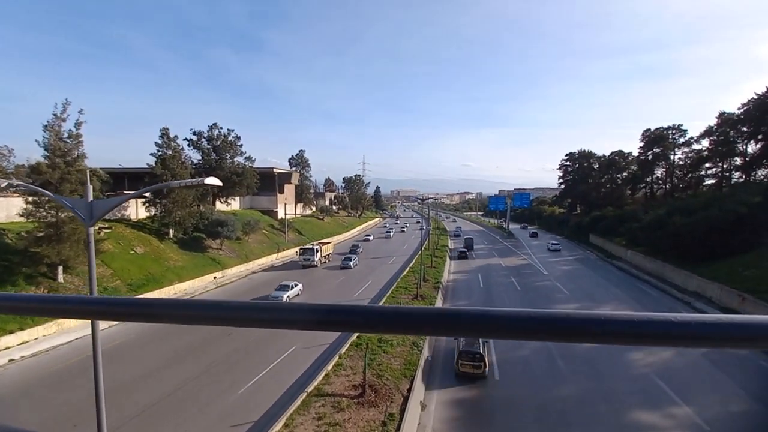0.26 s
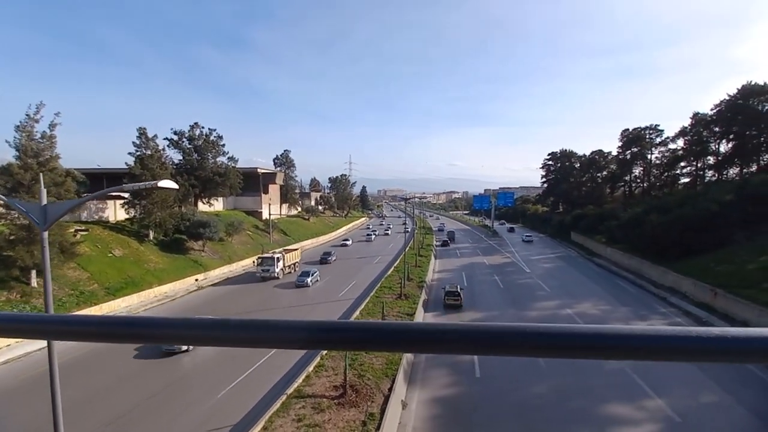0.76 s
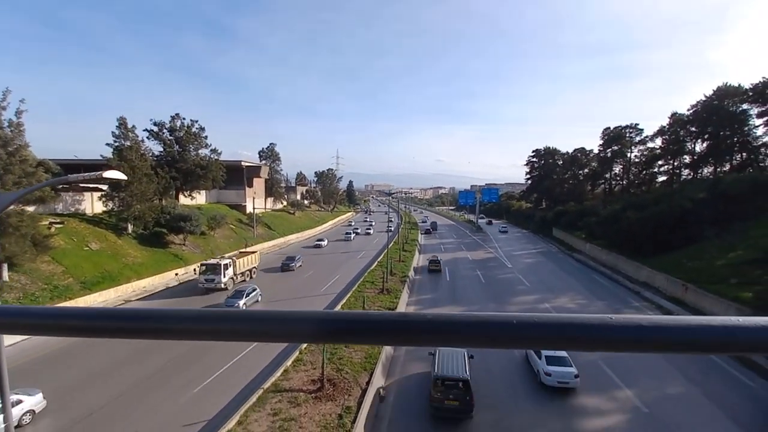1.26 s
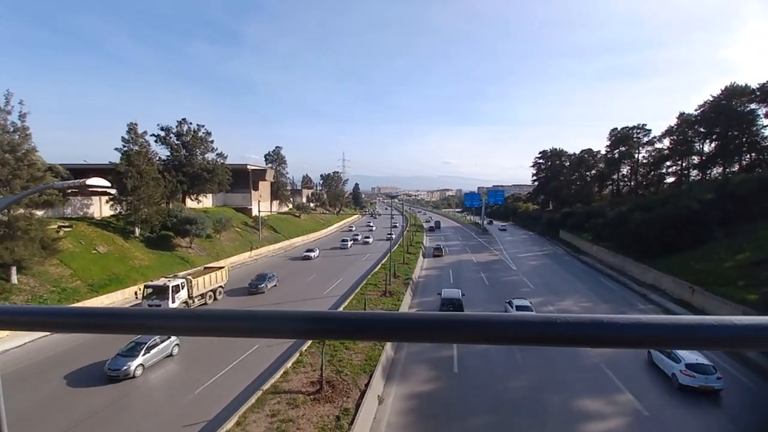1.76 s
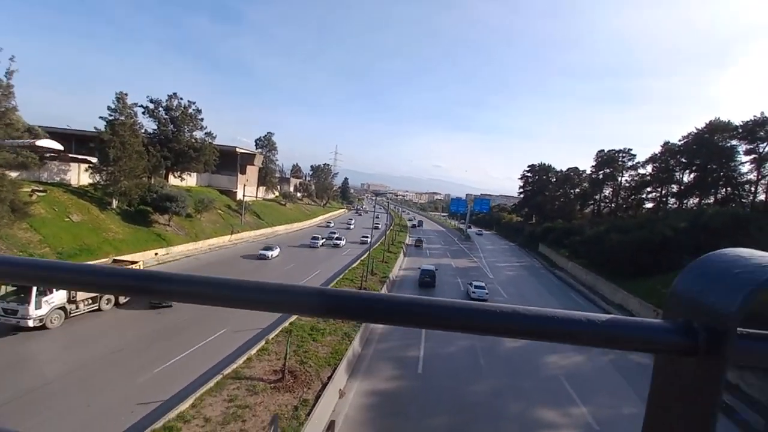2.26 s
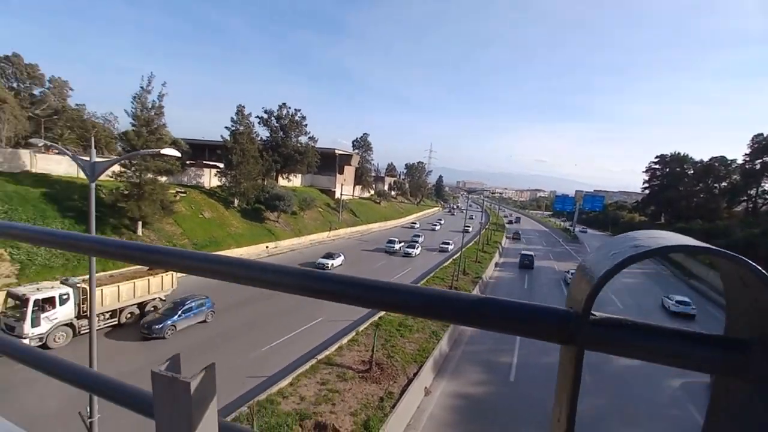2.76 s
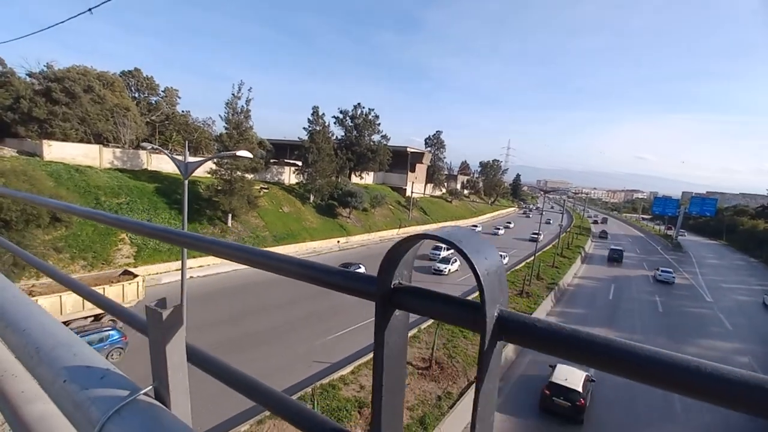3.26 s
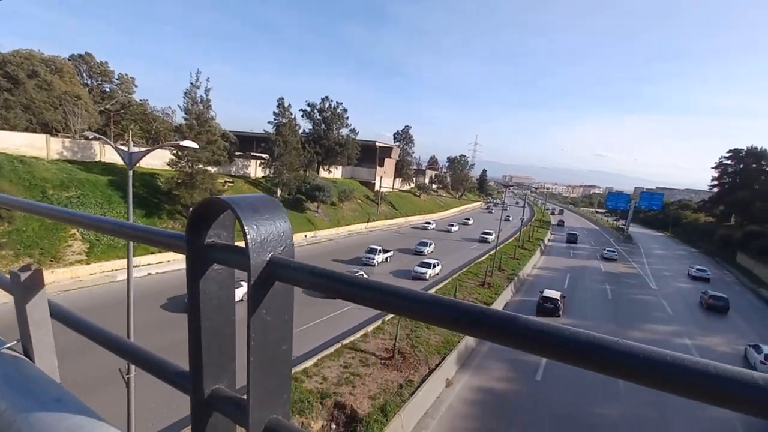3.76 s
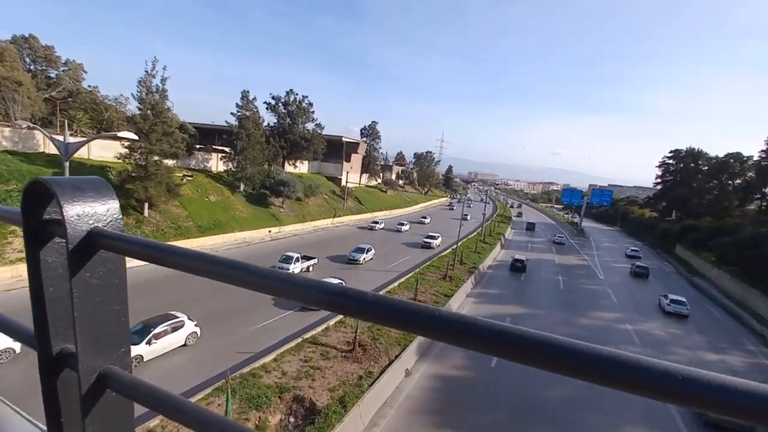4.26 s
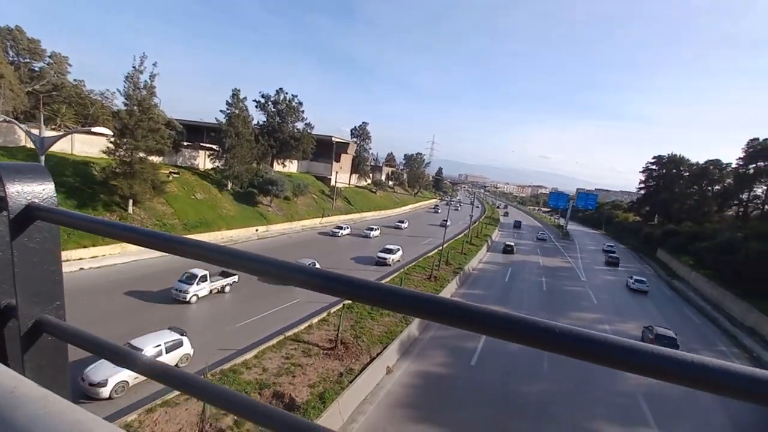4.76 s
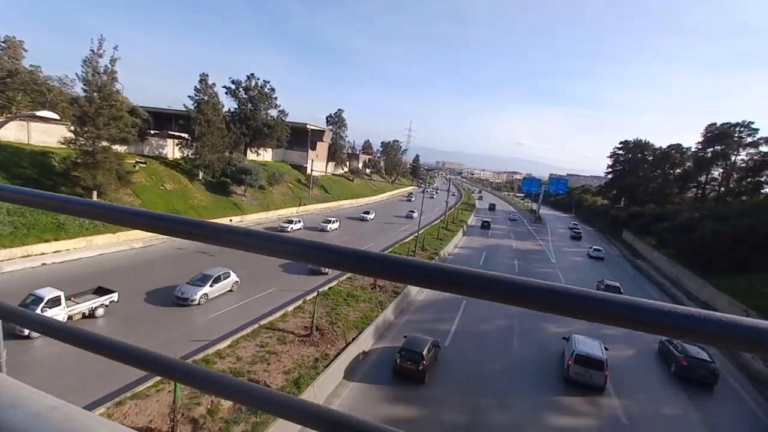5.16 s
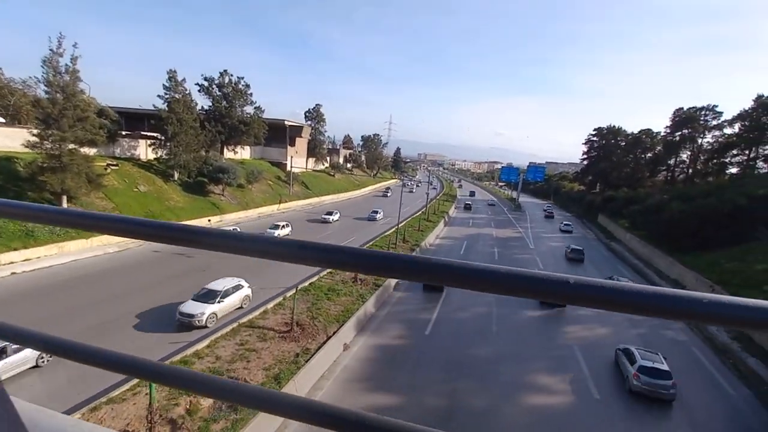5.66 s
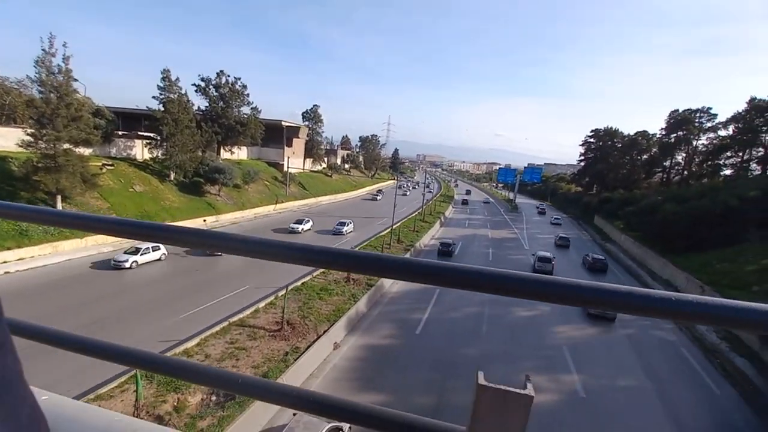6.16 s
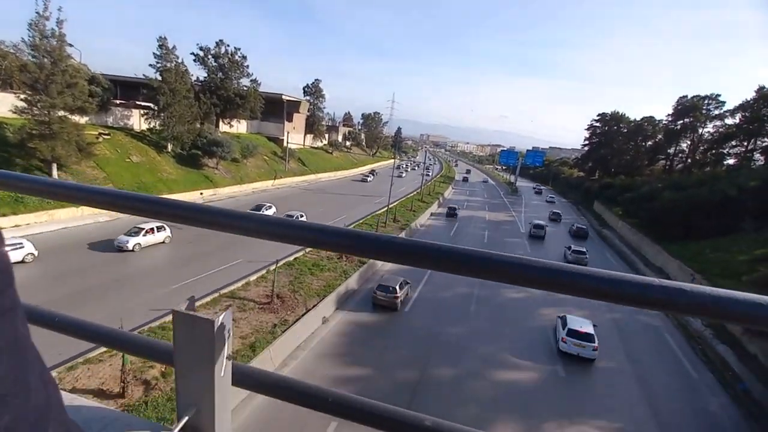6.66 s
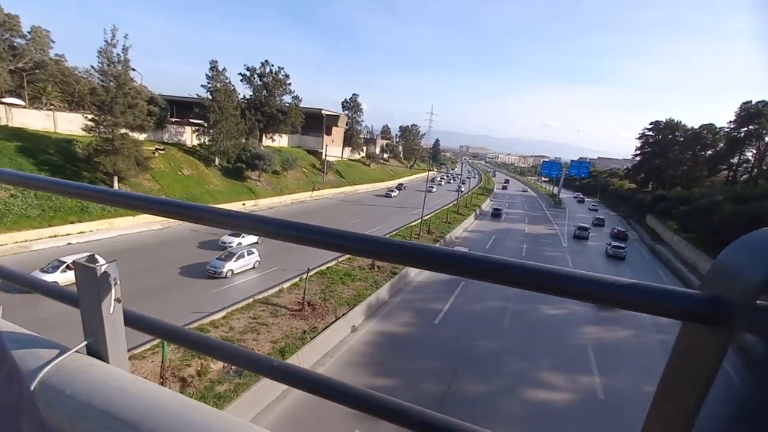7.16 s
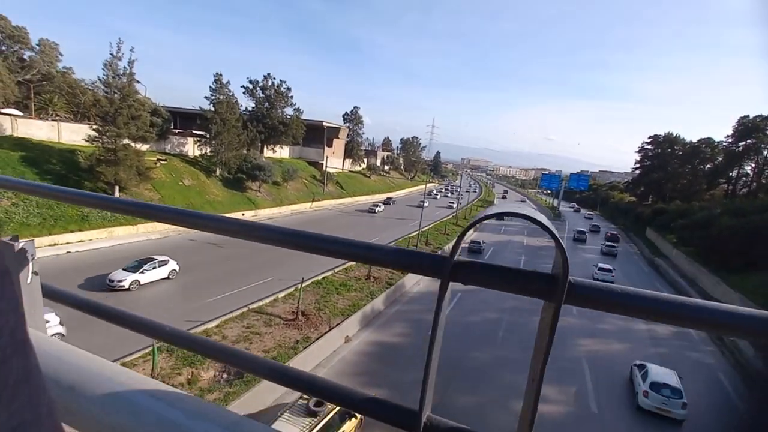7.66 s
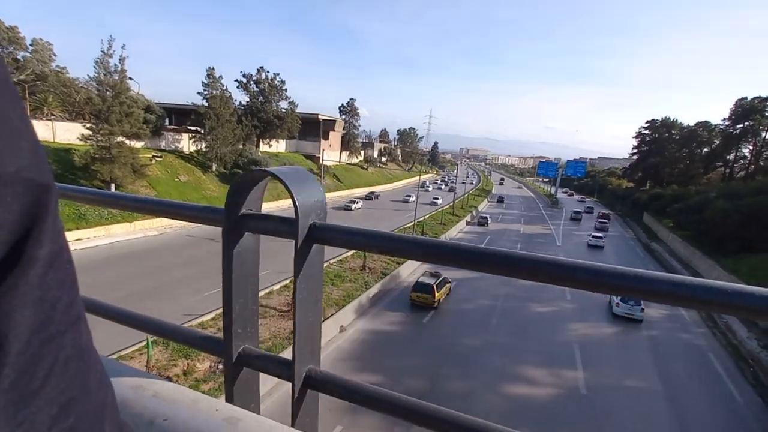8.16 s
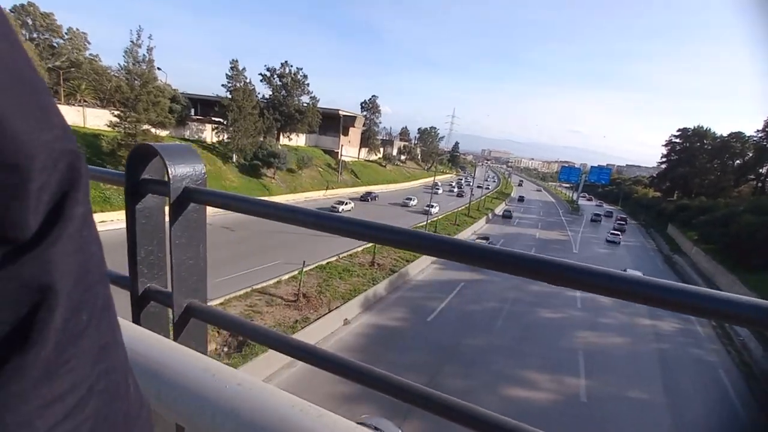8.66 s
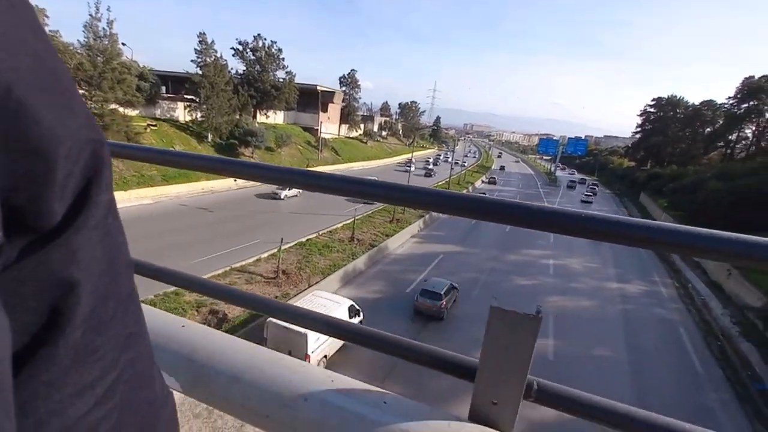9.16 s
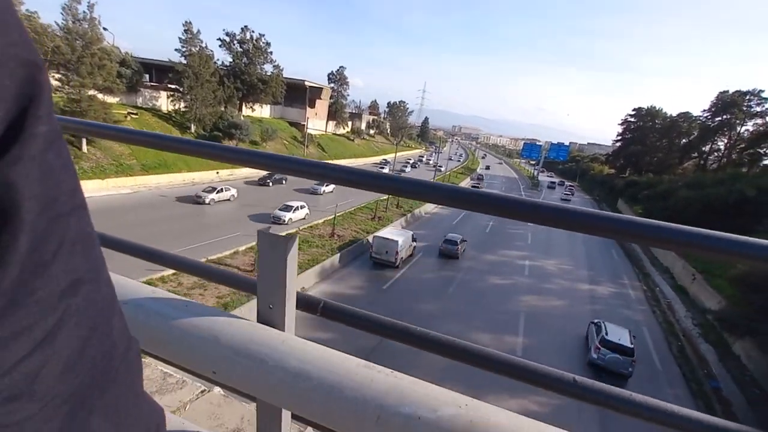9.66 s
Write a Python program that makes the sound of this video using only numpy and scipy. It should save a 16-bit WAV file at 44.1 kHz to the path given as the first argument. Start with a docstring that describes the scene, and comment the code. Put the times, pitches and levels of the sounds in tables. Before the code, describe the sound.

Steady rush of fast traffic below a footbridge, tyre roar and hiss swelling with each passing car over a low engine rumble.

```python
"""On a footbridge over a busy motorway: tyres roar and hiss, each car a swell of filtered noise.
Single treads sing as gliding noise bands; engines rumble as bass noise under a diesel truck's firing orders.
A tipper's empty bed booms in short noise bursts, and the low mids open up for a moment.
Wind puffs are brief low noise and soft bumps are damped sines, at two microphone ports."""
import sys
import numpy as np
from scipy import signal
from scipy.fft import rfft, irfft, next_fast_len
from scipy.io import wavfile
from scipy.ndimage import uniform_filter1d, map_coordinates

SR = 44100
rng = np.random.default_rng(int(sys.argv[2]) if len(sys.argv) > 2 else 0)


def generate_wav(sig):
    """Save sig (samples, or channels by samples) to the path in sys.argv[1] as 16-bit PCM at SR."""
    pcm = np.round(np.clip(np.atleast_2d(sig).T, -1, 1) * 32767).astype(np.int16)
    wavfile.write(sys.argv[1], SR, pcm)


N = 437031
FFT_SIZE = 2048  # samples in each short-time spectrum
STEP = 64  # samples between points of the slow curves


def amp(db):
    """Decibels to gain."""
    return 10 ** (np.asarray(db) / 20)


def unit(x):
    """Scaled to rms 1."""
    return x / np.sqrt(np.mean(x ** 2) + 1e-20)


def seconds():
    """The time of each sample."""
    return np.arange(N) / SR


def ramp(start_s, length_s):
    """Rises from 0 to 1 over length_s."""
    return np.clip((seconds() - start_s) / length_s, 0, 1)


def bell(t, middle_s, half_length_s):
    """A smooth bump of height 1, down to 1/e at half_length_s either side."""
    return np.exp(-np.minimum(((t - middle_s) / half_length_s) ** 2, 20))


def pan_gain(left_minus_right_db):
    """Gains for left and right that share a level difference equally."""
    return amp(np.outer([.5, -.5], left_minus_right_db))


def level_at(points):
    """The level of (s, dB) points at each sample."""
    return np.interp(seconds(), *np.transpose(points))


def along(points, hz):
    """Each column of (Hz, ..) points, read on a log axis."""
    point_hz, *columns = np.transpose(points)
    return [np.interp(np.log(hz + 1), np.log(point_hz + 1), column) for column in columns]


def wobble(rate_hz):
    """A smooth random curve, rate_hz knots a second."""
    knots = rng.standard_normal(int(N * rate_hz / SR) + 4)
    coarse = np.arange(0, N + STEP, STEP)
    curve = map_coordinates(knots, [coarse * rate_hz / SR], mode="nearest")
    return np.interp(np.arange(N), coarse, curve)


# How the tyre sound meets the two ports: pitch_hz, likeness (0-1), left_lead_rad
TYRE_PORTS = [(400, 0.68, 0.18), (620, 0.29, 0.08), (760, 0.78, 0.32), (983, 0.81, 1.13), (1240, 0.7, 1.87),
              (1544, 0.46, 2.13), (1790, 0.51, 3.1), (2250, 0.61, 5.97), (2710, 0.4, 8.17),
              (2980, 0.55, 9.4), (3300, 0.27, 12.6), (3800, 0, 15.1), (4380, 0.33, 18.55), (6000, 0, 25)]
# Traffic bearing: time_s, delay_scale (times the usual lead), likeness_scale (times the usual likeness)
TRAFFIC_BEARING = [(0, 0.99, 0.66), (2.2, 1.07, 0.95), (2.9, 0.95, 1.14), (3.8, 0.972, 0.88),
                   (4.8, 1.02, 1.2), (5.6, 1.07, 0.5), (7, 1.06, 0.13), (7.7, 1, .25), (8.1, .98, 0.6),
                   (9.91, 1.01, 0.71)]
FOCUS_FROM_HZ, FOCUS_FULL_HZ = 970, 1700  # scattered traffic blurs only the short waves


def at_ports(spectra, ports):
    """Two unrelated noises become left and right, alike and delayed as the bearing of the traffic moves."""
    hz = np.linspace(0, SR / 2, spectra.shape[1])[:, None]
    frame_s = np.linspace(0, N / SR, spectra.shape[2])
    point_s, *columns = np.transpose(TRAFFIC_BEARING)
    delay, focus = (np.interp(frame_s, point_s, column) for column in columns)
    # stretching the frequency axis stretches the delay
    alike, lead = along(ports, hz * delay)
    focused = np.interp(hz, [FOCUS_FROM_HZ, FOCUS_FULL_HZ], [0, 1])
    alike = np.clip(alike * (1 + (focus - 1) * focused), 0, 1)
    left = spectra[0]
    right = alike * left + np.sqrt(1 - alike ** 2) * spectra[1]
    return np.array([left, right * np.exp(-1j * lead)])


def rush(spectrum, ports, patchy_db, pan=None):
    """Stereo noise of rms 1, with drifting patches of gain as paths add and cancel."""
    spectra = signal.stft(rng.standard_normal((2, N)), nperseg=FFT_SIZE)[2]
    hz = np.linspace(0, SR / 2, spectra.shape[1])
    patches = rng.standard_normal(spectra.shape[1:])
    patches = uniform_filter1d(patches, size=14, axis=0)  # across pitch
    patches = uniform_filter1d(patches, size=6, axis=1)  # across time
    spectra = at_ports(spectra, ports)
    if pan is not None:
        spectra = spectra * pan_gain(along(pan, hz)[0])[:, :, None]
    tone_db = along(spectrum, hz)[0][:, None]
    spectra = spectra * amp(tone_db + patchy_db * unit(patches))
    return unit(signal.istft(spectra, nperseg=FFT_SIZE)[1][:, :N])


# Wind puffs: middle_s, half_length_s, level_db, left_minus_right_db
WIND_PUFFS = [(.14, 0.023, -31, -9), (1.07, .025, -33, -7), (1.557, .03, -33, -1), (2.27, 0.031, -32, 3),
              (3.24, .09, -33, 2), (3.5, 0.032, -32, 7), (4.447, .022, -35, -12), (5.475, 0.025, -26, -1),
              (7.2, .07, -37.5, -12), (7.723, 0.028, -35, -21), (8.19, .05, -38, -16)]
# Tone of a puff: pitch_hz, relative level_db per Hz
WIND_TONE = [(20, -24), (50, -19), (80, 7.5), (120, 1), (190, -4.5), (300, -16.5), (600, -57)]


def wind():
    """Short eddies bump the microphone ports: brief swells of low noise."""
    t = seconds()
    swell = sum(amp(db) * pan_gain(pan_db) * bell(t, middle_s, half_s)
                for middle_s, half_s, db, pan_db in WIND_PUFFS)
    return swell * rush(WIND_TONE, [(30, .3, 0), (100, 0.78, 0)], patchy_db=2)


# Soft bumps: start_s, gain_db on the body's ring, left_minus_right_db
SOFT_BUMPS = [(1.062, -17.5, -7), (2.099, -19, 1), (2.811, -24, 2), (5.456, -17, 0), (5.492, -17, -3),
              (5.733, -16, -6)]
# Resonances of the body that holds the microphones: pitch_hz, relative level_db, t60_s (time to fall 60 dB)
BODY_MODES = [(81, -1.5, 0.14), (127, 2.5, 0.064), (170, 0.5, 0.067), (255, -5, 0.044)]


def bumps():
    """A soft touch sets off a few heavily damped cycles in the microphones' body."""
    out = np.zeros((2, N))
    t = np.arange(SR // 4) / SR
    ring = sum(amp(db - 60 * t / t60_s) * np.sin(2 * np.pi * hz * t) for hz, db, t60_s in BODY_MODES)
    thud = ring * (1 - np.exp(-t / 0.0054))  # soft onset
    for start_s, db, pan_db in SOFT_BUMPS:
        out[:, round(start_s * SR):][:, :len(t)] += amp(db) * pan_gain(pan_db) * thud
    return out


# Tone of the hollow rush: pitch_hz, relative level_db per Hz
HOLLOW_SPECTRUM = [(140, -30), (240, -6.5), (330, 1), (450, 0.5), (600, -1.5), (750, -16), (1000, -68)]
# Hollow rush while it is open: time_s, level_db
HOLLOW_CURVE = [(5.8, -27.5), (6.2, -27.5), (6.42, -30), (6.6, -26), (6.85, -29), (7.15, -26)]
HOLLOW_ON_S, HOLLOW_OFF_S, HOLLOW_EDGE_S = 5.79, 7.19, 0.012


def hollow():
    """The low mids open up, swell, then close again: a gated band of noise."""
    opening = ramp(HOLLOW_ON_S, HOLLOW_EDGE_S)
    closing = ramp(HOLLOW_OFF_S - HOLLOW_EDGE_S, HOLLOW_EDGE_S)
    level_db = level_at(HOLLOW_CURVE) + 0.69 * wobble(40)
    pan = [(220, -2), (400, 3.5), (600, 2.0)]  # pitch_hz, left_minus_right_db
    noise = rush(HOLLOW_SPECTRUM, [(400, 0.41, 0.0053)], patchy_db=1.8, pan=pan)
    return amp(level_db) * (opening - closing) * noise


# Tone of the blurred engines: pitch_hz, relative level_db per Hz
RUMBLE_SPECTRUM = [(20, -34), (48, -41), (60, -17.5), (73, 11.5), (90, -0.5), (115, -6), (160, -3.5),
                   (215, -2), (290, -8), (400, -10), (700, -54)]
# Engine rumble, before the left side is turned down: time_s, level_db
RUMBLE_CURVE = [(0, -33), (1.8, -34), (3.3, -32.5), (3.9, -35), (4.5, -33.5), (5.2, -33.5), (6.3, -33),
                (7.3, -31.5), (8.3, -32), (9.1, -32), (9.91, -31.5)]
# Harmonics of the truck: order (multiple of the firing rate), relative level_db
FIRING_ORDERS = [(1, 3), (2, -4), (3, 6), (4, -3)]
# the truck holds its level and mean pitch, then sinks in both as it goes under the bridge
TRUCK_PASS_S, TRUCK_DB, TRUCK_FADE_DB_PER_S = 2.8, -37, 17
FIRING_HZ, SAG_HZ_PER_S = 73.2, 2.46
# the bass thins out on the left: when, how fast, left gain before and after
THIN_S, THIN_TAKES_S, LEFT_BEFORE_DB, LEFT_AFTER_DB = 3.85, 0.22, -5, -23


def engines():
    """Many exhausts blur into a rumble; the truck's firing orders stand out and sink as it passes."""
    rumble_db = level_at(RUMBLE_CURVE) + 0.31 * wobble(7.9) + 2.0 * wobble(30)
    rumble = amp(rumble_db) * rush(RUMBLE_SPECTRUM, [(100, 0.38, 0.081)], patchy_db=1.55)
    gone_s = np.maximum(seconds() - TRUCK_PASS_S, 0)
    firing_hz = FIRING_HZ - SAG_HZ_PER_S * gone_s
    truck_db = TRUCK_DB - TRUCK_FADE_DB_PER_S * gone_s
    unsteady = 1 + 0.0201 * wobble(21.85) + 0.015 * wobble(3)
    crank = 2 * np.pi * np.cumsum(firing_hz * unsteady) / SR
    diesel = sum(amp(db + 2.8 * wobble(15)) * np.sin(order * crank + 0.75 * wobble(25.08))
                 for order, db in FIRING_ORDERS)
    left_db = LEFT_BEFORE_DB + (LEFT_AFTER_DB - LEFT_BEFORE_DB) * ramp(THIN_S, THIN_TAKES_S)
    return (rumble + amp(truck_db) * unit(diesel)) * amp([left_db, np.zeros(N)])


# Booms of the empty bed: start_s, peak level_db
BED_BOOMS = [(3.49, -30), (3.635, -30.5), (3.76, -31), (3.9, -33)]
# Tone of the steel bed: pitch_hz, relative level_db per Hz
BED_SPECTRUM = [(120, -30), (190, -1.5), (230, 4), (290, -5), (420, -19), (700, -52)]
BOOM_PEAK_S = 0.015  # rise of one boom


def booms():
    """Each jolt sets the tipper's steel bed drumming: noise that rises fast and decays."""
    swell = 0
    for start_s, db in BED_BOOMS:
        age = np.maximum(seconds() - start_s, 0) / BOOM_PEAK_S
        swell = swell + amp(db) * age * np.exp(1 - age)
    return swell * rush(BED_SPECTRUM, [(230, 0.82, .1)], patchy_db=1)


# Singing treads: start_s, end_s, start_hz, end_hz, width (share of start_hz), level_db before trim and swell
SINGING_TREADS = [(0, .77, 1640, 1520, 0.19, -21), (0, .7, 2247, 2110, .25, -31.5),
                  (0, 1.301, 860, 781, 0.26, -32.5), (0.285, .72, 4250, 4030, 0.095, -37.5),
                  (0, 0.599, 3280, 3010, 0.16, -32), (0.899, 2.001, 1430, 1472, 0.21, -27),
                  (1.05, 2.801, 1850, 1800, 0.22, -28.5), (0.981, 1.549, 2280, 2230, 0.19, -30),
                  (1.999, 3.099, 2144, 2267, .42, -29.5), (2.849, 3.449, 3610, 3400, 0.1, -33.5),
                  (2.952, 3.549, 2500, 2334, 0.35, -25.5), (3.201, 4.7, 2049, 2252, 0.39, -23.5),
                  (4.3, 5.101, 2620, 2563, 0.23, -26), (3.85, 5.101, 1120, 1202, .35, -26),
                  (5.248, 5.649, 1500, 1345, 0.54, -28), (5.8, 7, 1400, 1200, 0.47, -24.5),
                  (6.42, 6.699, 1200, 1022, 0.35, -22.5), (7.4, 7.9, 1250, 1100, 0.54, -29),
                  (7.839, 8.071, 1807, 1652, 0.46, -26), (7.88, 8.14, 1148, 1000, 0.31, -22.5),
                  (8.05, 8.329, 1667, 1543, 0.59, -24.5), (8.49, 8.951, 1798, 1698, 0.35, -20.5),
                  (8.521, 9.249, 2480, 2305, 0.23, -30), (8.799, 9.5, 1696, 1479, 0.53, -22),
                  (9.301, 9.9, 2300, 2153, 0.3, -31)]
TREAD_TRIM_DB = -1.7
TREAD_SWELL = 0.44  # below 1, the song comes up fast and holds
TREAD_FLUTTER_DB = 1.7  # a tread sings unevenly over the asphalt
TREAD_PAN_DB = -3  # left minus right, at the start
PAN_DB_PER_S = 0.19  # treads and tyres drift leftward


def treads():
    """Irregular tread blocks sing as a narrow noise band that glides and swells as the car goes by."""
    out = np.zeros((2, N))
    for start_s, end_s, start_hz, end_hz, width, db in SINGING_TREADS:
        first, last = max(0, int(start_s * SR)), min(N, int(end_s * SR))
        u = np.linspace(0, 1, last - first)
        narrow = signal.butter(3, width * start_hz / 2, fs=SR, output="sos")
        noise = rng.standard_normal((2, len(u))) + 1j * rng.standard_normal((2, len(u)))
        blocks = signal.sosfilt(narrow, noise)
        # shift the band up to the gliding pitch
        glide_hz = start_hz + (end_hz - start_hz) * u
        turn = np.exp(2j * np.pi * np.cumsum(glide_hz) / SR)
        swell = np.abs(np.sin(np.pi * u)) ** TREAD_SWELL
        out[:, first:last] += amp(db + TREAD_TRIM_DB) * swell * unit((blocks * turn).real)
    spectra = signal.stft(out * amp(TREAD_FLUTTER_DB * wobble(45)), nperseg=FFT_SIZE)[2]
    pair = signal.istft(at_ports(spectra, TYRE_PORTS), nperseg=FFT_SIZE)[1][:, :N]
    return pair * pan_gain(TREAD_PAN_DB + PAN_DB_PER_S * seconds())


# Brief dips in the tyre sound: middle_s, half_length_s, depth_db
TYRE_DIPS = [(1.684, .035, 1.5), (3.49, 0.05, 1.5), (5.163, 0.06, 2), (6.69, 0.05, 1.5),
             (8.412, 0.085, 1.5)]
DIP_TREBLE = 1.8  # hiss, air and sizzle dip this many times as deep, in dB


def dip_db(t):
    """How far the tyre sound sinks in the lulls."""
    return sum(db * bell(t, middle_s, half_s) for middle_s, half_s, db in TYRE_DIPS)


# Finest spray of the tyre hiss: pitch_hz, relative level_db per Hz
SIZZLE_SPECTRUM = [(5000, -40), (7500, -2), (9600, -1), (12500, -1), (15700, -11)]
# Highest treble, before trim and dips: time_s, level_db
SIZZLE_CURVE = [(0.0, -54), (0.94, -55), (1.02, -49), (1.63, -57), (2.04, -49), (2.9, -54), (3.01, -49),
                (3.42, -57.5), (4.72, -51), (5.13, -57), (5.24, -50), (5.74, -58), (7.51, -62), (7.7, -56),
                (8.75, -61), (9.08, -55), (9.49, -57.5), (9.91, -51)]


def sizzle():
    """The highest treble of the tyre hiss swells and fades apart from the roar, as thin bright noise."""
    level_db = level_at(SIZZLE_CURVE) + 1.3 * wobble(12)
    level_db = level_db + 1.7 - DIP_TREBLE * dip_db(seconds())
    return amp(level_db) * rush(SIZZLE_SPECTRUM, [(8000, .12, 0)], patchy_db=3.5)


# Vehicles passing the bridge: nearest_s, passing_s (distance over speed), then levels when nearest, before
# dips and trims: roar_db (treads), hiss_db (grooves), air_db (air round the body)
VEHICLE_PASSES = [(.25, 0.54, -26, -29.5, -41), (1.2, 0.56, -25, -27.5, -42.5),
                  (1.98, 0.25, -41, -45, -40.5), (2.5, 0.82, -26, -24.5, -37),
                  (3.18, 0.35, -20.5, -26, -42), (3.93, 0.26, -22.5, -26.5, -43),
                  (4.57, 0.26, -27, -27.5, -40), (5.03, 0.055, -23, -25, -47),
                  (5.42, 0.28, -24, -30.5, -44), (6.05, 0.2, -25, -29, -45),
                  (6.52, 0.16, -19.5, -28.5, -45.5), (7.3, 0.63, -37, -33, -56),
                  (8, 0.13, -18.5, -30.5, -44), (8.22, 0.11, -26, -30.5, -43),
                  (8.61, 0.12, -21, -32.5, -47), (8.82, 0.051, -19.5, -34, -46), (9, 0.13, -28, -29, -41),
                  (9.25, 0.14, -19.5, -36, -44), (9.62, 0.18, -24, -46, -50)]
FAR_ROAR_DB, FAR_HISS_DB, FAR_AIR_DB = -21.5, -32, -43.5  # steady stream further along, before dips and trims
FALL_DB = 28.5  # lost at ten times the distance, as a tyre beams its sound


def traffic():
    """Levels in dB of roar, hiss and air: each vehicle swells and fades with distance, over the far stream."""
    t = seconds()[::STEP]
    power = amp([[FAR_ROAR_DB], [FAR_HISS_DB], [FAR_AIR_DB]]) ** 2
    for nearest_s, passing_s, *levels_db in VEHICLE_PASSES:
        distance = np.sqrt(1 + ((t - nearest_s) / passing_s) ** 2)  # 1 when nearest
        fall = amp(-FALL_DB * np.log10(distance))
        power = power + np.outer(amp(levels_db), fall) ** 2
    levels = 10 * np.log10(power) - np.outer([1, DIP_TREBLE, DIP_TREBLE], dip_db(t))
    return [np.interp(seconds(), t, level) for level in levels]


# Tread roar of cars: pitch_hz, relative level_db per Hz
CAR_ROAR = [(150, -59), (280, -24), (420, -11), (590, -12), (680, -6), (780, -3), (930, 1), (1150, 1.5),
            (1750, -1.5), (2050, -7), (2600, -26), (4000, -67)]
# Tread roar of heavy wheels: pitch_hz, relative level_db per Hz
TRUCK_ROAR = [(150, -46), (280, -15), (420, -13), (590, -13), (680, -5), (780, 0), (930, 1.5), (1150, -0.5),
              (1750, -0.5), (2050, -5.5), (2600, -29), (4000, -62)]
# Hiss of the tread grooves: pitch_hz, relative level_db per Hz
GROOVE_HISS = [(1300, -42), (1850, -2), (2200, 2.5), (2550, 0.3), (3000, -2.5), (3500, -6.5), (4300, -14),
               (5000, -23.5), (7000, -45)]
# Air rushing round the bodies: pitch_hz, relative level_db per Hz
BODY_AIR = [(2000, -16), (2900, 8.5), (3400, 3.5), (4200, 3), (4900, 0.5), (6100, 1), (6800, -1.5),
            (8100, -2), (9600, -10), (12000, -17.5), (15700, -22)]
# Balance of roar and hiss: pitch_hz, left_minus_right_db
ROAD_BALANCE = [(250, 11.5), (420, 5.5), (570, 0), (720, -0.5), (1300, -1.5), (2400, -2.5), (3500, -1),
                (5000, 2)]
HEAVY_S, HEAVY_SPREAD_S = 2.3, 3.4  # heavy wheels dominate around this time
FLUTTER_DB = 0.18  # slower unevenness of the asphalt
PAN_START_DB = -0.5  # left minus right, added to the road balance


def tyres():
    """Roar, hiss and rushing air are noise bands; uneven asphalt flutters them together, and each on its own."""
    roar_db, hiss_db, air_db = traffic()
    heavy = bell_share = np.exp(-((seconds() - HEAVY_S) / HEAVY_SPREAD_S) ** 2)
    cars = rush(CAR_ROAR, TYRE_PORTS, patchy_db=1.3, pan=ROAD_BALANCE)
    trucks = rush(TRUCK_ROAR, TYRE_PORTS, patchy_db=0.82, pan=ROAD_BALANCE)
    wheels = np.sqrt(1 - heavy) * cars + np.sqrt(heavy) * trucks
    flutter = FLUTTER_DB * wobble(30) + 0.91 * wobble(95)
    # the constant in each line is a small level trim
    roar = amp(roar_db - 0.32 + flutter + 1.21 * wobble(55)) * wheels
    grooves = rush(GROOVE_HISS, TYRE_PORTS, patchy_db=1.63, pan=ROAD_BALANCE)
    hiss = amp(hiss_db - 1.27 + flutter + 1.0 * wobble(36)) * grooves
    air = amp(air_db - 0.05 + flutter + 0.73 * wobble(22)) * rush(BODY_AIR, TYRE_PORTS, patchy_db=1.74)
    return (roar + hiss + air) * pan_gain(PAN_START_DB + PAN_DB_PER_S * seconds())


def scene():
    """Everything that reaches the bridge."""
    return wind() + bumps() + hollow() + engines() + booms() + treads() + sizzle() + tyres()


TOP_HZ = 15750


def record(dry):
    """The microphones pass nothing from their band limit, TOP_HZ, upwards."""
    size = next_fast_len(N + SR // 2)
    passed = np.fft.rfftfreq(size, 1 / SR) < TOP_HZ
    return irfft(rfft(dry, size) * passed, size)[:, :N]


dry = scene()
out = record(dry)
generate_wav(out)
```